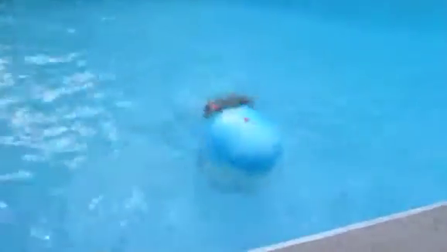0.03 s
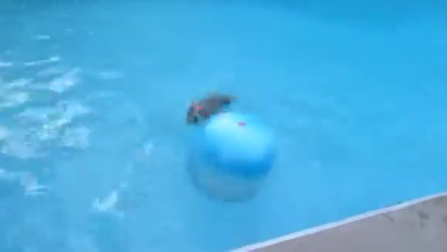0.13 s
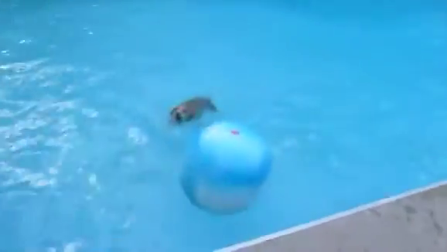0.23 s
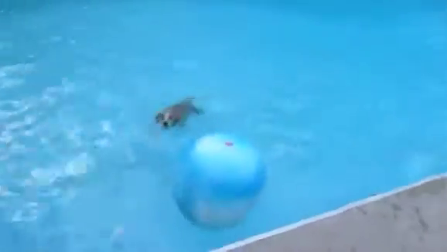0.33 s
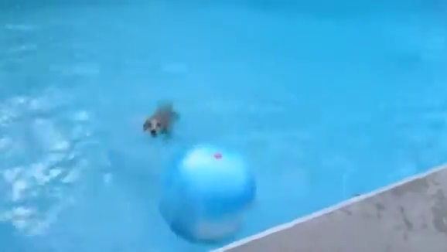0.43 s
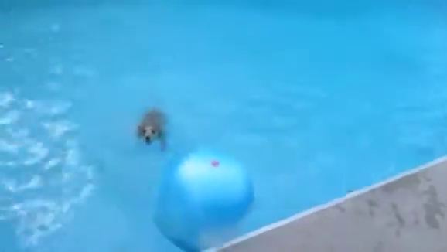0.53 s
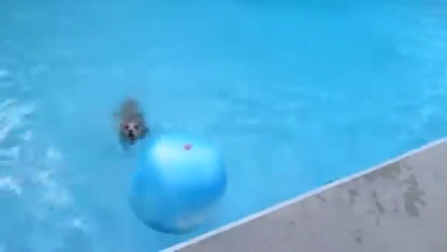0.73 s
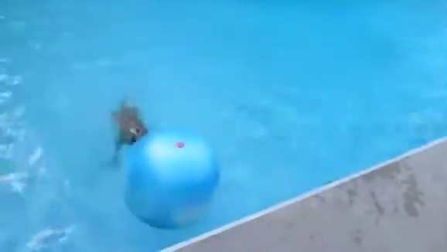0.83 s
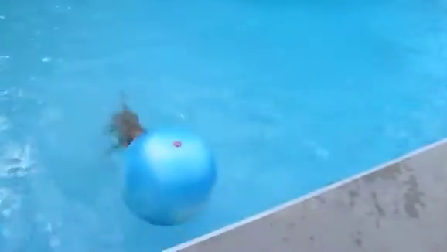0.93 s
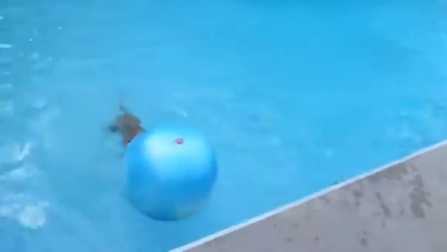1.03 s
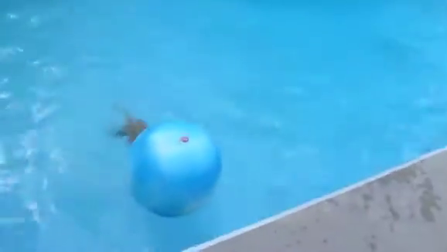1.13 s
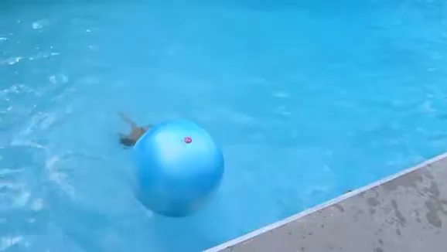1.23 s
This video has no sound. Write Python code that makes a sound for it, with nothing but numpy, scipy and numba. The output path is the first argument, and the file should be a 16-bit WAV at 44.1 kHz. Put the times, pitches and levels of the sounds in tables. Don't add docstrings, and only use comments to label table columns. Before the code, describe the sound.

Two high, rough barks from a small swimming dog ring off hard walls over soft water drips.

```python
import sys
import numpy as np
from scipy import signal
from scipy.fft import rfft, irfft
from scipy.io import wavfile
from scipy.ndimage import uniform_filter1d
from numba import njit

SR = 44100
rng = np.random.default_rng(int(sys.argv[2]) if len(sys.argv) > 2 else 0)


def voltage_ratio(level):
    return 10 ** (np.asarray(level, float) / 20)


def file_out(sig):
    cols = np.atleast_2d(sig).T
    lim = np.clip(cols, -1, 1)
    pcm = np.round(lim * 32767).astype(np.int16)
    wavfile.write(sys.argv[1], SR, pcm)


N = 57330


def evened(x):
    return x / np.sqrt(np.mean(x ** 2) + 1e-20)


def read_curve(points, hz):
    f, value = np.transpose(points)
    return np.interp(np.log(hz + 1), np.log(f + 1), value)


def level_gain(points):
    s, db = np.transpose(points)
    return voltage_ratio(np.interp(np.arange(N) / SR, s, db))


def add(mix, s, sound):
    part = mix[..., round(s * SR):][..., :sound.shape[-1]]
    part += sound[..., :part.shape[-1]]


def resonate(x, hz, width_hz):
    turn = np.exp(2j * np.pi * np.cumsum(hz * np.ones(len(x))) / SR)
    r = np.exp(-np.pi * width_hz / SR)
    return 2 * (turn * signal.lfilter([(1 - r) ** 2], [1, -2 * r, r * r], x / turn)).real


# pitch_hz, likeness (0-1)
SIDE_LIKENESS = [(60, 0.29), (160, 1), (420, 0.88), (1110, 0.89), (2930, 0.56), (7730, 0.74)]


def drifting_noise(colour, patchy_db, flicker_db):
    frames, hz = N // 128 + 5, np.fft.rfftfreq(512, 1 / SR)
    a, b, c, d, patch = rng.standard_normal((frames, 257, 5)).T
    patch = uniform_filter1d(patch, size=5, axis=0)
    patch = evened(uniform_filter1d(patch, size=14, axis=1))
    flicker = evened(uniform_filter1d(rng.standard_normal(frames), size=6))
    same = read_curve(SIDE_LIKENESS, hz)[:, None]
    left = a + 1j * b
    right = same * left + np.sqrt(1 - same ** 2) * (c + 1j * d)
    gain_db = read_curve(colour, hz)[:, None] + patchy_db * patch + flicker_db * flicker
    z = np.array([left, right]) * voltage_ratio(gain_db)
    return evened(signal.istft(z, nperseg=512, noverlap=384)[1][:, :N])


# pitch_hz, level_db (per Hz)
WIND_COLOUR = [(12, -46.5), (20, -18.5), (119, 5), (156, -3), (222, -2.5), (307, -10), (331, -3.5),
               (400, -17), (520, -6), (880, -120)]
# start_s, level_db
WIND_STRENGTH = [(0, -43), (.1, -46), (.2, -45.5), (.45, -47), (.65, -46.5), (.8, -42.5), (1.0, -43.5),
                 (1.15, -46), (1.3, -46.5)]


def wind():
    hz = np.fft.rfftfreq(N, 1 / SR)
    flat = drifting_noise([(1, 0), (20000, 0)], patchy_db=0, flicker_db=3)
    rumble = irfft(rfft(flat) * voltage_ratio(read_curve(WIND_COLOUR, hz)), N)
    return evened(rumble) * level_gain(WIND_STRENGTH)


# pitch_hz, level_db (per Hz)
LAP_COLOUR = [(150, -15), (250, -8), (1080, -3), (1210, -6), (1620, -6), (1840, -8.5), (2540, -11),
              (7200, -18.5), (9360, -65), (15800, -120)]
# start_s, level_db
LAP_STRENGTH = [(0, -34), (0.122, -39.5), (0.201, -32), (.4, -35), (.6, -43), (0.801, -44), (1.048, -39.5),
                (1.3, -48)]


def lapping_water():
    return level_gain(LAP_STRENGTH) * drifting_noise(LAP_COLOUR, patchy_db=1.8, flicker_db=1)


# start_s,
# level_db, pitch_hz, length_cycles
DRIP_EVENTS = [(.044, -25, 730, 9), (.071, -29, 3800, 12), (.094, -31, 3200, 14), (.209, -25, 3600, 14),
               (.476, -34, 4950, 55), (.606, -34, 4300, 7), (.732, -38, 5000, 10), (.524, -38, 6300, 9),
               (.745, -39, 2300, 5), (.838, -19, 6800, 12), (.138, -31, 270, 5), (.203, -31, 5000, 12),
               (.216, -28, 4800, 12), (.181, -31, 200, 3), (.37, -27, 5500, 14), (.351, -15, 770, 9),
               (.955, -27, 4600, 20), (1.275, -33, 260, 5)]


def drips():
    out = np.zeros((2, N))
    sides_db = rng.uniform(1, 1.8, (len(DRIP_EVENTS), 1, 1))
    for (s, db, hz, cycles), side_db in zip(DRIP_EVENTS, sides_db):
        u = np.arange(0, 2 * cycles / hz, 1 / SR) * hz / cycles
        tone = np.sin(2 * np.pi * cycles * u * (1 + .01 * u))
        tone = tone * np.minimum(u / .2, 1) * np.exp(-2.5 * u ** 2)
        add(out, s, voltage_ratio(db) * tone * voltage_ratio(side_db * np.array([[1], [-1]])))
    return out


# pitch_hz, t60_s
YARD_T60 = [(250, .3), (600, 0.66), (1200, 0.93), (2500, 0.78), (5000, 0.35)]
# pitch_hz, level_db
YARD_TONE = [(300, -34.5), (600, 6.5), (1200, 2), (1700, 4), (2500, -8), (5000, 9)]


def yard(x):
    far_wall_s, spread_s, far_wall_db = 0.17, 0.066, 4
    ring_hz, ring_width_hz, ring_db = 1630, 80, 7
    same = 0.68
    taps = np.zeros((2, SR))
    at = np.arange(1200, SR - 20, 20) + rng.integers(0, 20, (2, (SR - 1201) // 20))
    np.put_along_axis(taps, at, rng.choice([-1., 1.], at.shape), 1)
    taps = np.array([taps[0], same * taps[0] + np.sqrt(1 - same ** 2) * taps[1]])
    hz, t, z = signal.stft(taps, SR, nperseg=256)
    wall_db = far_wall_db * np.exp(-((t - far_wall_s) / spread_s) ** 2)
    decay_db = -60 * t / read_curve(YARD_T60, hz)[:, None]
    shape = voltage_ratio(read_curve(YARD_TONE, hz)[:, None] + wall_db + decay_db)
    tail = signal.istft(z * shape, SR, nperseg=256)[1]
    tail = tail + voltage_ratio(ring_db) * np.array([resonate(c, ring_hz, ring_width_hz) for c in tail])
    tail = tail / np.linalg.norm(tail[0]) / 4
    return signal.fftconvolve(x[None], tail, axes=1)[:, :N]


# delay_s, level_db
NEAR_ECHOES = [(.0021, -13), (.0058, -16), (.011, -15), (.019, -15), (.031, -15), (.047, -16), (.066, -18)]


def near_echoes(dog):
    near = dog.copy()
    dull = signal.lfilter(*signal.butter(1, 1700, fs=SR), dog)
    for s, db in NEAR_ECHOES:
        add(near, s, -voltage_ratio(db) * dull)
    return near


# pitch_hz, lead_rad
PORT_LEAD = [(100, 0.47), (900, -0.62), (2100, -.6), (2900, -0.36), (7000, -0.53)]
# pitch_hz, level_db
PORT_TILT = [(100, 5.7), (1000, -1.2), (3000, -0.1), (6000, 4.5)]


def ports(x):
    hz = np.fft.rfftfreq(N, 1 / SR)
    half = voltage_ratio(read_curve(PORT_TILT, hz) / 2) * np.exp(.5j * read_curve(PORT_LEAD, hz))
    return irfft(rfft(x) * np.array([half, 1 / half]), N)


def vocal_folds(hz, rough):
    jitter, shimmer_db, uneven, uneven_below_hz = .5, 1.8, .3, 600
    wobble, swing, air = rng.standard_normal((3, len(hz)))
    turns = np.cumsum(hz * (1 + jitter * rough * uniform_filter1d(wobble, size=80))) / SR
    folds = sum(np.cos(2 * np.pi * k * turns) for k in range(1, 17))
    folds = folds * voltage_ratio(shimmer_db * evened(uniform_filter1d(swing, size=120)))
    lopsided = np.clip((uneven_below_hz - hz) / 120, 0, 1)
    folds = folds * (1 + uneven * lopsided * np.cos(np.pi * turns))
    puffs = (.25 + np.exp(-(turns % 1) / .3)) * air
    puffs = signal.lfilter(*signal.butter(2, 9000, fs=SR), puffs)
    return turns, evened(folds), evened(puffs)


def mouth(drive, puffs, low_hz, high_hz, open_db, nose_hz):
    low = resonate(drive, low_hz, 520)
    high = voltage_ratio(open_db) * resonate(drive, high_hz, 950)
    third = voltage_ratio(open_db - 10) * resonate(drive, 1.2 * high_hz, 450)
    breath = voltage_ratio(open_db / 2 - 32.5) * resonate(drive + puffs, 4085, 2620)
    nose_db = -21 + open_db / 2 + 28 * np.log2(high_hz / 2800)
    nose = voltage_ratio(nose_db) * resonate(drive + 0.99 * puffs, nose_hz, 850)
    return low - high + third + breath + nose


# start_s, effort_db, pitch_hz, low_mouth_hz, high_mouth_hz, brightness_db, roughness (0-1)
FIRST_BARK = [
    (.176, -57, 224.3, 900, 1940, -21, 0.26),
    (.202, -20, 301.1, 833, 1887, -24, 0.36),
    (.222, 0.5, 458.5, 870, 2160, -11, 0.24),
    (.245, 4.5, 525.5, 926, 1964, -4, 0.47),
    (.276, 0.5, 628, 1256, 2808, 0.5, 0.25),
    (.3, -2, 654.4, 1382, 2830, 0.5, 0.24),
    (.328, -3, 639.7, 1350, 2824, 0.5, 0.4),
    (.345, -7, 544.4, 1148, 2686, 7.5, 0.36),
    (.362, -11, 516.5, 895, 2470, -18.5, 0),
]
# start_s, effort_db, pitch_hz, low_mouth_hz, high_mouth_hz, brightness_db, roughness (0-1)
SECOND_BARK = [
    (.818, -39, 405, 880, 2800, -15.5, 0.42),
    (0.832, -5.5, 409, 1064, 2980, -14.5, 0.4),
    (.843, -5, 433.5, 1027, 2824, -5, .32),
    (0.861, -1, 581.9, 1072, 2730, 6, 0.46),
    (0.887, -2.5, 596.1, 1318, 2810, -6, 0.38),
    (.9, 3, 669.3, 1212, 2370, 0, 0.17),
    (0.916, -3, 638.4, 1367, 2600, -1.5, 0.18),
    (0.939, -3.5, 577, 1242, 2873, -14.5, 0.47),
    (.955, -14, 532, 1100, 2600, -5.5, 0.8),
]


def bark(rows):
    s, *cols = np.transpose(rows)
    t = np.arange(s[0], s[-1], 1 / SR)
    effort_db, hz, low_hz, high_hz, open_db, rough = (np.interp(t, s, c) for c in cols)
    turns, folds, puffs = vocal_folds(hz, rough)
    drive = (1 - rough) * folds + rough * puffs
    nose_hz = 6900 - 1500 * ((t - s[0]) / (s[-1] - s[0])) ** 1.36
    voice = mouth(drive, puffs, low_hz, high_hz, open_db, nose_hz)
    voice = voice / np.sqrt(uniform_filter1d(voice ** 2, size=900))
    shut_db = np.maximum(-13 - open_db, 0)
    chest_db = -4 + 14 * np.log2(hz / 640) + 2.06 * shut_db
    voice = voice + voltage_ratio(chest_db) * np.cos(2 * np.pi * turns)
    voice = -voltage_ratio(effort_db) * voice * np.minimum((s[-1] - t) / 0.0033, 1)
    f, when, z = signal.stft(voice, SR, nperseg=512, noverlap=448)
    ratio = f[:, None] / (.72 * np.interp(when + s[0], t, hz))
    z = z * ratio ** 8 / (1 + ratio ** 8)
    return s[0], signal.istft(z, SR, nperseg=512, noverlap=448)[1][:len(t)]


def scene():
    dog = np.zeros(N)
    for rows in (FIRST_BARK, SECOND_BARK):
        add(dog, *bark(rows))
    background = wind() + lapping_water() + drips()
    return background + voltage_ratio(-8) * yard(dog) + ports(near_echoes(dog))


@njit
def follow(over_db, grab, let_go):
    out, state = np.zeros(len(over_db)), 0.
    for i in range(len(over_db)):
        state += (over_db[i] - state) * (grab if over_db[i] > state else let_go)
        out[i] = state
    return out


def roll_off(x):
    return signal.sosfilt(signal.butter(12, 8330, fs=SR, output="sos"), x)


def record(dry):
    knee_db, squeeze, grab_s, let_go_s = -34, .5, .022, .014
    ceiling, edge_hz = 1.05, 7020
    power_db = 10 * np.log10(abs(uniform_filter1d((dry ** 2).mean(0), size=300)) + 1e-12)
    over_db = np.maximum(power_db - knee_db, 0)
    cut_db = squeeze * follow(over_db, 1 / (grab_s * SR), 1 / (let_go_s * SR))
    x = dry / voltage_ratio(cut_db)
    x = x / (1 + (x / ceiling) ** 6) ** (1 / 6)
    band_limit = signal.firwin(101, edge_hz, window=("kaiser", 8), fs=SR)
    x = signal.oaconvolve(x, band_limit[None], "same")
    return roll_off(x)


dry = scene()
out = record(dry)
file_out(out)
```